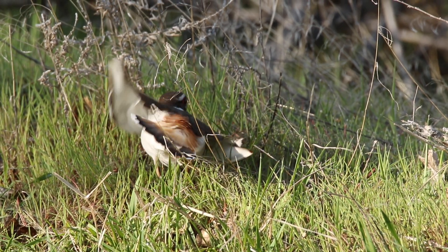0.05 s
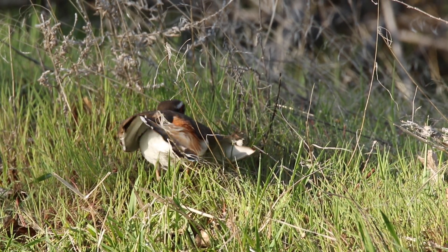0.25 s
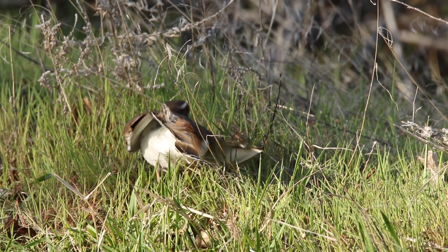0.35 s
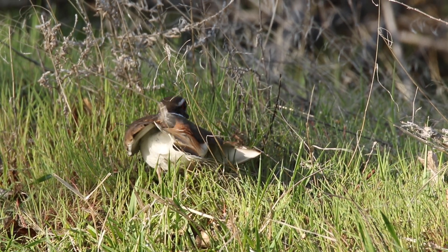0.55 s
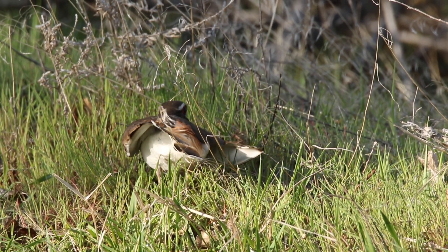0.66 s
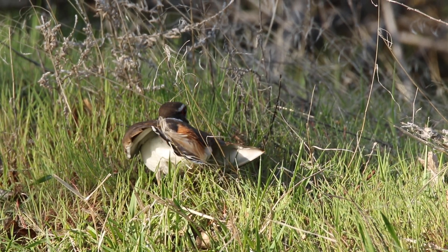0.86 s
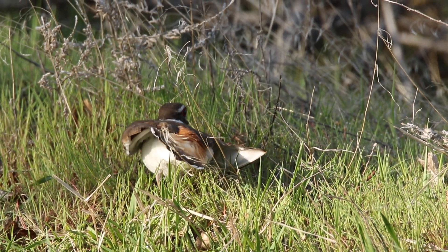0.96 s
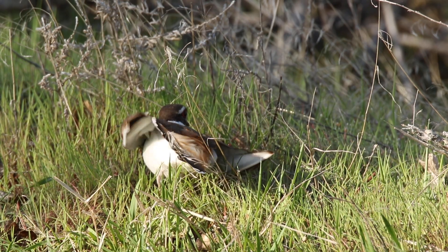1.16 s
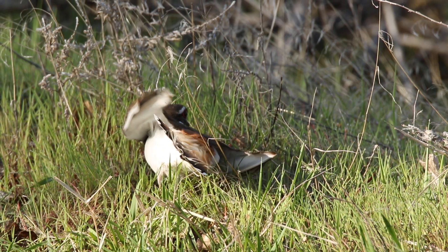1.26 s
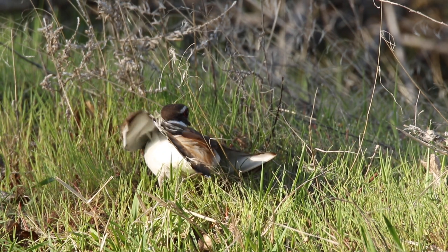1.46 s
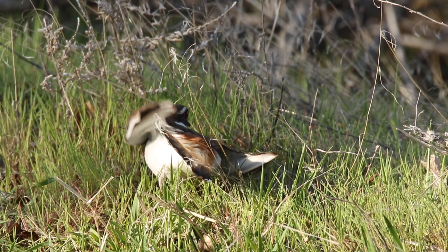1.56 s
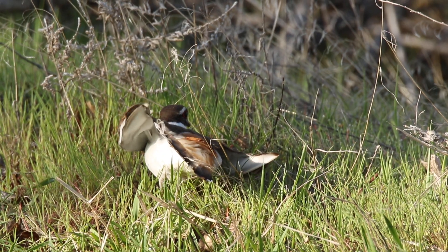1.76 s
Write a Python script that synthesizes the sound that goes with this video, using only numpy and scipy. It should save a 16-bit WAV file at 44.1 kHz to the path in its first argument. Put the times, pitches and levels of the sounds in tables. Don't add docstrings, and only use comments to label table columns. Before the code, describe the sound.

A close waterfowl honks four times, each a rough creaky growl snapping into a brief nasal note; thin high whistles recur, distant fowl and songbirds answer, one dry stem snaps, all in open air with soft hiss.

```python
import sys
import numpy as np
from scipy import signal
from scipy.io import wavfile
from scipy.ndimage import uniform_filter1d

SR = 44100
rng = np.random.default_rng(int(sys.argv[2]) if len(sys.argv) > 2 else 0)


def pcm_store(signal):
    levels = np.round(np.clip(np.atleast_2d(signal), -1, 1) * 32767)
    wavfile.write(sys.argv[1], SR, levels.astype(np.int16).T)


def field_ratio(decibels):
    return 10 ** (np.asarray(decibels, dtype=float) / 20)


N = 79380
T = np.arange(N) / SR

# (lock time [s], end [s], pitch [Hz], level [dB], brightness [dB per octave])
CLEAN_NOTES = [
    (0.254, .34, 655, -28.5, 1),
    (0.648, 0.723, 655, -29, -2.5),
    (1.101, 1.143, 660, -29.5, -6.5),
    (1.475, 1.531, 661, -29.5, -5.5),
]
# (centre [Hz], width [Hz], level [dB])
THROAT_RESONANCES = [(1038, 97, -3.5), (1232, 190, 2.5), (1906, 560, -5), (2270, 1400, -24),
                     (3800, 560, -34), (6400, 550, -50), (7550, 740, -51)]


def level(x, db):
    return x * field_ratio(db) / np.sqrt(np.mean(x ** 2))


def band(x, hz, width_hz):
    return signal.lfilter(*signal.iirpeak(hz, hz / width_hz, SR), x)


def double_band(x, hz, width_hz):
    return band(band(x, hz, width_hz), hz, width_hz)


def noise():
    return rng.standard_normal(N)


def walk(rate_hz):
    hold = int(SR / rate_hz)
    steps = np.repeat(rng.standard_normal(N // hold + 1), hold)
    return 1.3 * uniform_filter1d(uniform_filter1d(steps, hold), hold)[:N]


def gate(start, length, edge):
    inside = np.minimum(T - start, start + length - T)
    return np.sin(np.pi / 2 * np.clip(inside / edge, 0, 1)) ** 2


def bump(centre, width):
    return np.exp(-.5 * ((T - centre) / width) ** 2)


def tone(hz):
    return np.sqrt(2) * np.sin(2 * np.pi * np.cumsum(hz) / SR)


def air():
    # (frequency [Hz], level [dB per Hz])
    air_spectrum = [(15, -45), (25, -0.5), (104, -3), (267, -9), (1030, -6.5), (1270, -14), (1540, -18.5),
                    (5300, -30), (15600, -33)]
    spectrum_hz, spectrum_db = np.array(air_spectrum).T
    hiss = 0
    for hz in 30 * 2 ** np.arange(0, 9.1, .5):
        db = np.interp(np.log(hz), np.log(spectrum_hz), spectrum_db) + 10 * np.log10(hz)
        db = db + 0.45 * walk(6.04) * min(1, 2000 / hz)
        hiss = hiss + level(double_band(noise(), hz, hz / 1.64), 0) * field_ratio(db)
    traffic = level(band(noise(), hz=113, width_hz=9), -55)
    flock = level(double_band(noise(), hz=1250, width_hz=320) * field_ratio(walk(26.18)), -57)
    whine = field_ratio(-81) * tone(15704 + 0 * T)
    return level(hiss, -49.5) + traffic + flock + whine


def whistles():
    # (start [s], length [s], held pitch [Hz], level [dB])
    calls = [
        (-.012, .151, 4270, -53),
        (.516, .149, 4255, -53.5),
        (1.056, .154, 4295, -54),
        (1.657, .16, 4265, -54),
    ]
    peak_hz, peak_s, slide_s = 255, 0.0154, .018
    flick_hz, flick_s = 150, 0.0081
    out = 0
    for start, length, hz, db in calls:
        slide = peak_hz * bump(start + peak_s, slide_s)
        flick = flick_hz * np.exp(np.minimum(T - start - length, 0) / flick_s)
        dip_db = -3.5 * bump(start + .045, 0.0076) + 0.23 * walk(65)
        out = out + field_ratio(db + dip_db) * gate(start, length, 0.0054) * tone(hz + slide + flick)
    return out


def far_notes(rows, rasp, flutter_db, wobble):
    out = 0
    for start, length, hz, glide_hz, db in rows:
        pitch = (hz + glide_hz * np.clip((T - start) / length, 0, 1)) * (1 + wobble * walk(90))
        buzz = 1 + rasp * tone(160 * (1 + 0.0447 * walk(58.7)))
        out = out + field_ratio(db + flutter_db * walk(69.9)) * gate(start, length, 0.0035) * buzz * tone(pitch)
    return out


def far_fowl():
    # (start [s], length [s], pitch [Hz], glide [Hz], level [dB])
    fowl_notes = [(.02, 0.066, 1290, -28, -55), (.445, 0.051, 1382, -82, -51), (.49, 0.035, 787, 9, -52.5),
                  (.5, 0.032, 1250, 9, -46), (.528, 0.024, 940, -27, -41.5), (.54, 0.026, 1250, -45, -43),
                  (.58, 0.07, 950, 28, -45.5), (.86, 0.039, 1430, 10, -56), (.922, 0.031, 1297, -24, -46.5),
                  (.985, 0.048, 980, -21, -44.5), (1.21, 0.11, 1312, 12, -55.5), (1.25, 0.02, 1420, 0, -61),
                  (1.33, 0.07, 1049, 31, -52.5), (1.455, 0.031, 996, 13, -43.5),
                  (1.55, 0.052, 956, 32, -50), (1.61, 0.022, 785, 18, -51.5),
                  (1.635, 0.0375, 963, -47, -43.5), (1.65, 0.024, 1320, -9, -50),
                  (1.72, 0.059, 517.5, 13, -55), (0, 0.043, 485.6, 5, -53.5), (.96, 0.063, 488, -27, -56)]
    return far_notes(fowl_notes, rasp=0.34, flutter_db=0.5, wobble=0.0033)


def twitter():
    # (start [s], length [s], centre [Hz], width [Hz], level [dB])
    flurries = [
        (1.29, .21, 3750, 500, -59.5),
        (1.33, .2, 4130, 250, -63),
        (.04, .1, 2700, 1200, -63),
        (1.15, .07, 3650, 500, -65),
    ]
    out = 0
    for start, length, hz, width_hz, db in flurries:
        grains = double_band(noise(), hz, width_hz) * field_ratio(1.2 * walk(130))
        out = out + level(grains, db) * gate(start, length, 0.0072)
    return out


def songbirds():
    # (start [s], length [s], pitch [Hz], glide [Hz], level [dB])
    song_notes = [(.06, .1, 2600, -40, -68), (.205, .04, 3900, 0, -67), (.185, .02, 6000, -40, -71),
                  (.21, .06, 4960, -120, -69), (.92, .145, 3880, 40, -65), (1.25, .11, 4470, -470, -62.5),
                  (1.355, .025, 4020, 110, -59), (1.38, .06, 4120, -10, -62), (1.375, .09, 3980, -260, -63),
                  (1.47, .085, 3670, 30, -65), (1.455, .095, 4150, -60, -65), (1.585, .015, 4850, 0, -64),
                  (1.69, .015, 4850, 0, -65), (1.74, .06, 2620, -50, -66)]
    return far_notes(song_notes, rasp=0, flutter_db=2.0, wobble=.004)


def growls():
    # (time [s], pulse rate [Hz], effort [dB])
    growl_curves = [
        [(.172, 139.9, -68), (.177, 139.3, -47.5), (.2, 138.5, -49.5), (.222, 145.5, -47), (.24, 150, -41),
         (.252, 160, -36), (.268, 163, -61)],
        [(.568, 150, -47.5), (.595, 150, -44), (.612, 160, -45), (.625, 162.6, -41.5), (.645, 165.6, -40),
         (.67, 165.1, -75)],
        [(.985, 160, -53.5), (1.015, 164.8, -44), (1.034, 160, -45), (1.043, 154.4, -45), (1.055, 150, -42),
         (1.085, 146, -40), (1.103, 160, -38), (1.135, 155.2, -58)],
        [(1.376, 160, -50), (1.386, 160, -42.5), (1.402, 160, -44.5), (1.42, 167.3, -44.5), (1.45, 164.7, -44),
         (1.476, 165, -37), (1.495, 160, -45)],
    ]
    time, rate_hz, effort_db = np.concatenate(growl_curves).T
    jitter, shimmer_db, rasp_db = .14, 3.0, 7
    puff = .6
    phase = np.cumsum(np.interp(T, time, rate_hz) * (1 + jitter * walk(150))) / SR
    pulses = np.diff(np.floor(phase), prepend=0) * field_ratio(shimmer_db * noise())
    rasp = noise() * np.exp(-(phase % 1) / puff)
    drive = level(uniform_filter1d(pulses, size=3), 0) + level(rasp, rasp_db)
    effort = np.interp(T, time, effort_db)
    on = sum(gate(g[0][0], g[-1][0] - g[0][0], 0.0023) for g in growl_curves)
    voice = 0
    for hz, width_hz, db in THROAT_RESONANCES:
        bright_db = (effort + 38) * np.log2(hz / 1300) / 2
        voice = voice + field_ratio(db + bright_db) * double_band(drive, hz, 1.06 * width_hz)
    return on * field_ratio(effort) / np.std(double_band(drive, 1300, 334)) * voice


def flaps():
    # (time [s], peak [dB])
    flap_times = [(.1755, -41.5), (.191, -36), (0.203, -35.5), (0.21, -43), (0.228, -35), (.234, -33.5),
                  (.241, -30), (.247, -27), (0.578, -33), (0.588, -33), (.596, -29), (.6295, -24),
                  (.636, -34.5), (0.64, -27), (1.0505, -31.5), (1.0557, -31.5), (1.063, -29), (1.070, -23),
                  (1.0777, -27), (1.086, -25.5), (1.0912, -24), (1.0974, -25.5), (1.4355, -29),
                  (1.4416, -27.5), (1.4473, -28.5), (1.4532, -26), (1.459, -32), (1.466, -31),
                  (1.4732, -28)]
    # (centre [Hz], width [Hz], level [dB])
    rings = [
        (1014, 170, -6),
        (1290, 100, -4),
        (2030, 450, -1),
        (2970, 630, -10),
    ]
    out, t = np.zeros(N), T[:SR // 40]
    for start, peak_db in flap_times:
        rough = rng.standard_normal(len(t))
        push = (1 + 1.65 * uniform_filter1d(rough, size=6)) * t * np.exp(-t / 0.00037)
        push = push * np.cos(2 * np.pi * 1500 * t)
        ring = 0
        for hz, width_hz, db in rings:
            detune, uneven_db = 0.023 * rng.standard_normal(), 2 * rng.standard_normal()
            ring = ring + field_ratio(db + uneven_db) * band(push, hz * (1 + detune), width_hz) / width_hz
        first = int(start * SR)
        out[first:first + len(t)] += ring / np.abs(ring).max() * field_ratio(peak_db)
    return out


def honks():
    # (start [s], level under the note at start [dB], at lock [dB], chop depth [0-1])
    creaks = [
        (0.232, -22, -6, 0.5),
        (0.629, -10, -3.5, 0.02),
        (1.091, -17, -9, 0.4),
        (1.431, -17, -12, 0.58),
    ]
    # (multiple of the pitch, level [dB], drift as the beak opens [dB per s])
    partials = [(1, -18, -20), (2, 0, 0), (3, -3, 80), (4, -20, -60), (5, -28, 0), (6, -24, 220),
                (7, -32, 0), (8, -36, 0), (9, -38, 60), (10, -44, 0), (11, -39, -60), (12, -40, 0)]
    attack_s, scoop, scoop_s = .01, .006, .008
    fall, fall_s, bottom_s = .11, .032, .007
    fade_db, fade_s, close_db = 21, .036, 7
    out = 0
    for (lock, end, hz, db, tilt), (start, start_db, lock_db, depth) in zip(CLEAN_NOTES, creaks):
        age = np.clip(T - lock, 0, end - lock)
        loose = 1 - gate(lock - attack_s / 2, 9, attack_s)
        sag = np.clip(1 - (end - bottom_s - T) / fall_s, 0, 1) ** 2
        fade = np.clip(1 - (end - T) / fade_s, 0, 1) ** 2
        wobble = (0.00098 + .012 * loose) * walk(200)
        pitch = hz * (1 - scoop * np.exp(-((T - lock) / scoop_s) ** 2) - fall * sag + wobble)
        turn = 2 * np.pi * np.cumsum(pitch) / SR
        stack = 0
        for k, partial_db, drift in partials:
            k_db = partial_db + drift * (age - (end - lock) + 0.0505)
            k_db = k_db + tilt * np.log2(max(k / 3, 1))
            k_db = k_db - close_db * fade * abs(np.log2(k / 1.93))
            k_db = k_db - 1.5 * loose * abs(np.log2(k / 2))
            k_db = k_db + .25 * k * walk(69.94)
            early_stop = gate(0, end - bottom_s + 0.0024, 0.0079) if k > 2 else 1
            wave = -np.sqrt(2) * np.cos(k * turn + 0.4 * (k - 2) * (k - 3))
            stack = stack + field_ratio(k_db) * early_stop * wave
        chop_depth = np.clip(depth * (loose + 0.048 * (1 - loose)), 0, 1)
        chop = 1 + chop_depth * np.cos(turn / 4 + .5 * walk(60))
        creak_db = loose * (np.interp(T, [start, lock], [start_db, lock_db]) + 2.0 * walk(160))
        out = out + stack * chop * field_ratio(db + creak_db - fade_db * fade) * gate(start, end - start, 0.0028)
    return out


def bursts():
    breath = noise() * field_ratio(3.0 * walk(300))
    hiss = 0
    for hz, width_hz, db in THROAT_RESONANCES:
        if hz > 2950:
            hiss = hiss + field_ratio(db / 2) * double_band(breath, hz, width_hz)
    catches = sum(field_ratio(db + tilt) * bump(lock, .009) for lock, _, _, db, tilt in CLEAN_NOTES)
    return level(hiss, -25) * catches


def snap():
    # (time [s], peak [dB])
    ticks = [
        (0.8933, -37),
        (.8941, -28),
        (.8962, -38),
        (.8988, -36),
    ]
    # (frequency [Hz], level [dB], ring scale [s], about five times the 60 dB decay)
    modes = [(600, 10, 0.014), (1100, 8, .022), (1850, 4, 0.04), (3150, 1, 0.03), (4500, -7, 0.022),
             (7400, -14, 0.015)]
    grain = .3 * noise() - 1
    hit = 0
    for start, db in ticks:
        hit = hit + field_ratio(db) * grain * (T > start) * np.exp(-np.maximum(T - start, 0) / .00008)
    crack = 0
    for hz, db, ring_s in modes:
        crack = crack + field_ratio(db) * double_band(hit, hz, 15 / ring_s) * ring_s
    return crack / np.abs(crack).max() * field_ratio(max(db for _, db in ticks))


def arch():
    top_s, top_hz, drop_hz = 1.617, 2780, 800
    away = 1 - bump(top_s, .032)
    loudness = field_ratio(-58.5 - 20 * away + 2 * walk(79.3))
    return loudness * gate(top_s - .055, 0.14, 0.0078) * tone(top_hz - drop_hz * away)


def scene():
    near = growls() + flaps() + honks() + bursts() + snap()
    far = whistles() + far_fowl() + twitter() + songbirds() + arch()
    birds = near + far
    t = T[:SR // 2]
    tail = rng.standard_normal(len(t)) * np.exp(-np.log(1000) * t / 1) * (t > .01)
    echo = signal.fftconvolve(birds, tail / np.sqrt(np.sum(tail ** 2)))[:N]
    return (birds + field_ratio(-28) * echo + air())[None]


def band_limit(x):
    return signal.sosfilt(signal.butter(12, 15720, fs=SR, output="sos"), x)


def record(dry):
    bass_cut = signal.butter(3, 52, "high", fs=SR, output="sos")
    mix = signal.sosfilt(bass_cut, dry)
    return band_limit(mix)


dry = scene()
out = record(dry)
pcm_store(out)
```